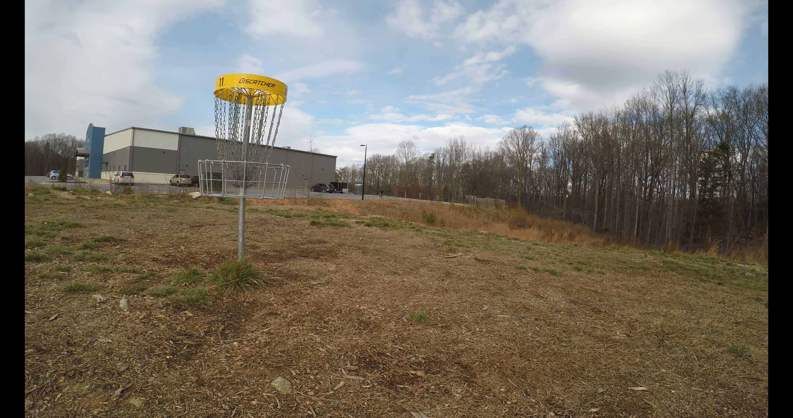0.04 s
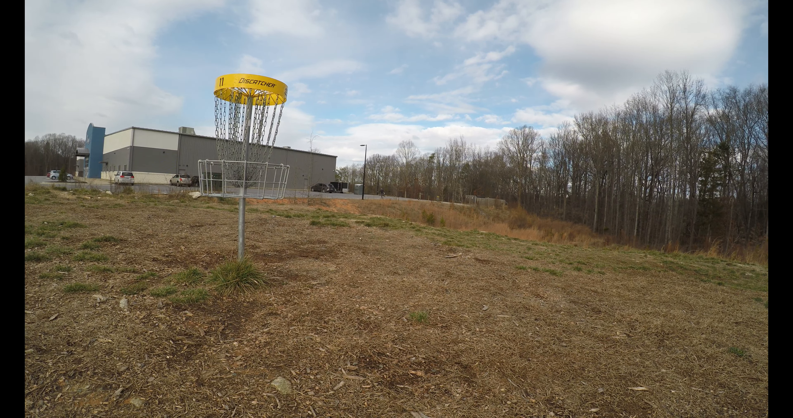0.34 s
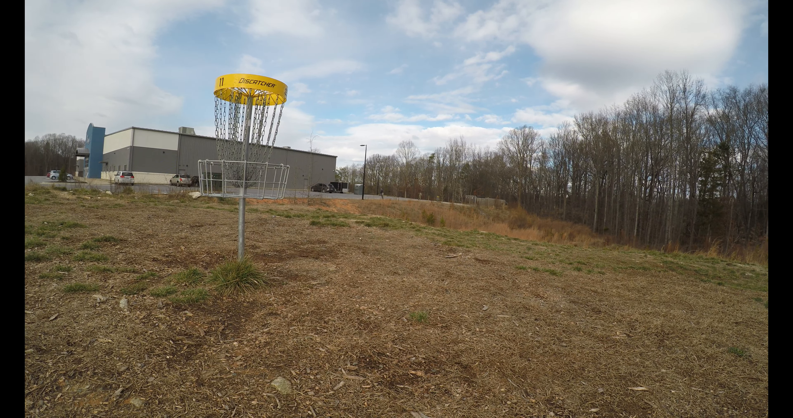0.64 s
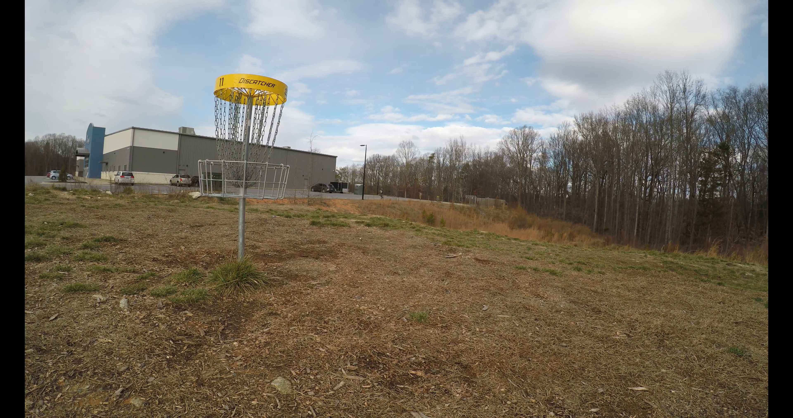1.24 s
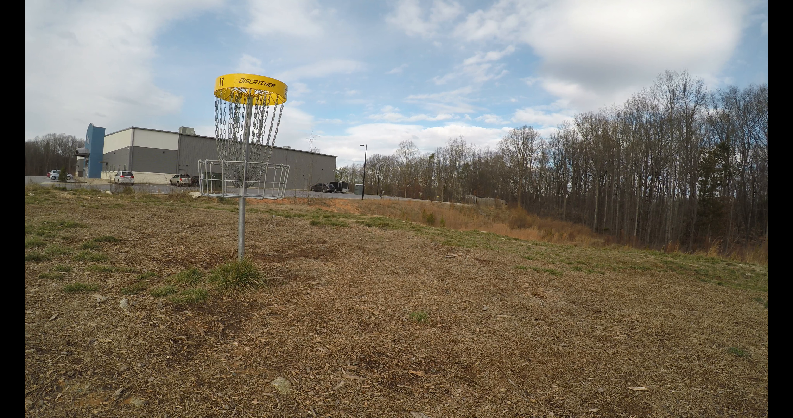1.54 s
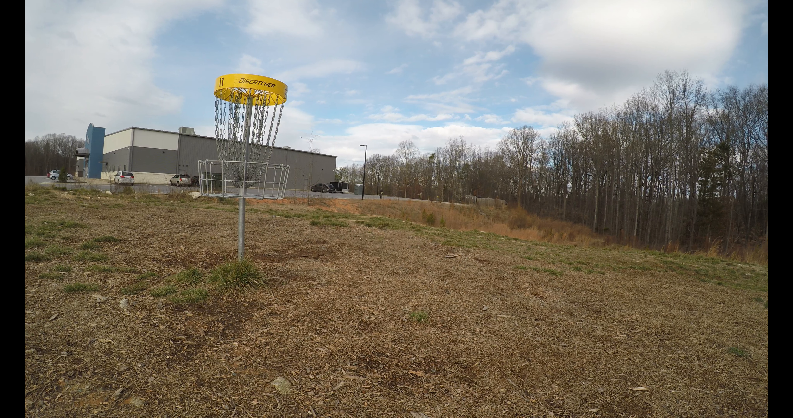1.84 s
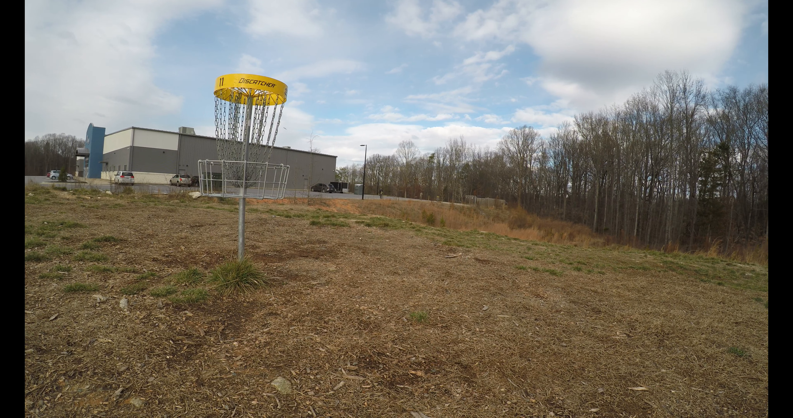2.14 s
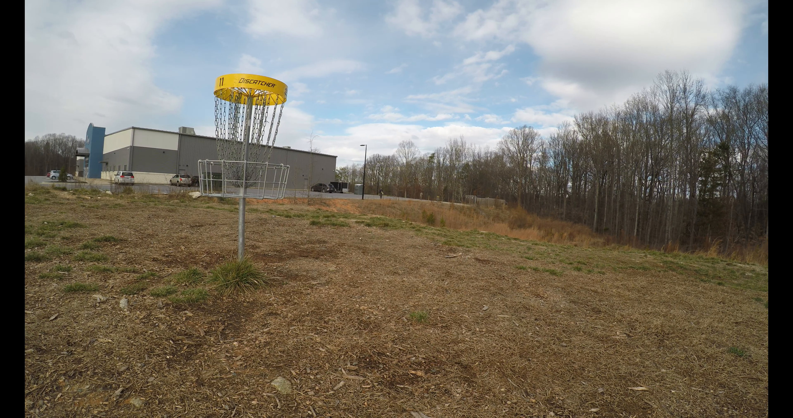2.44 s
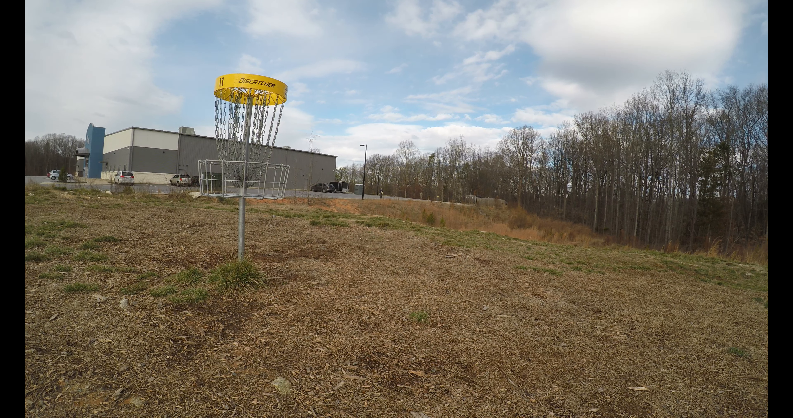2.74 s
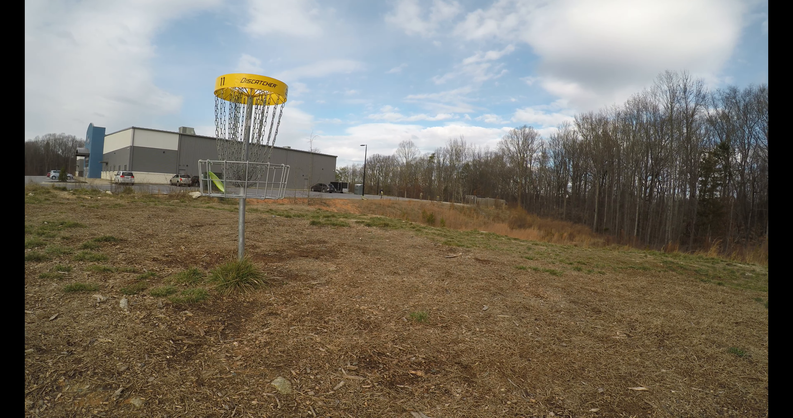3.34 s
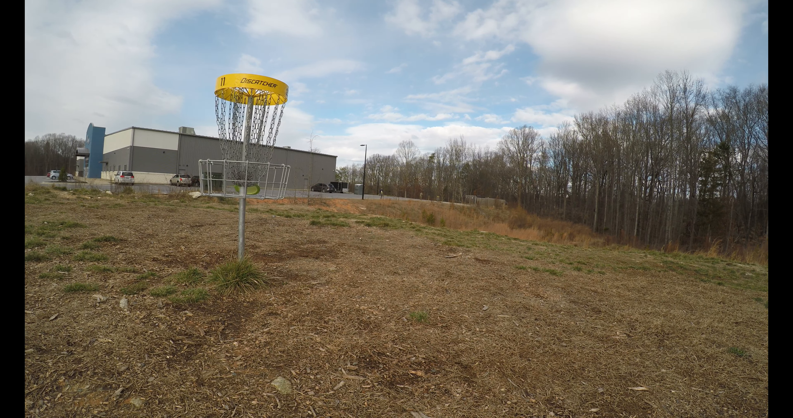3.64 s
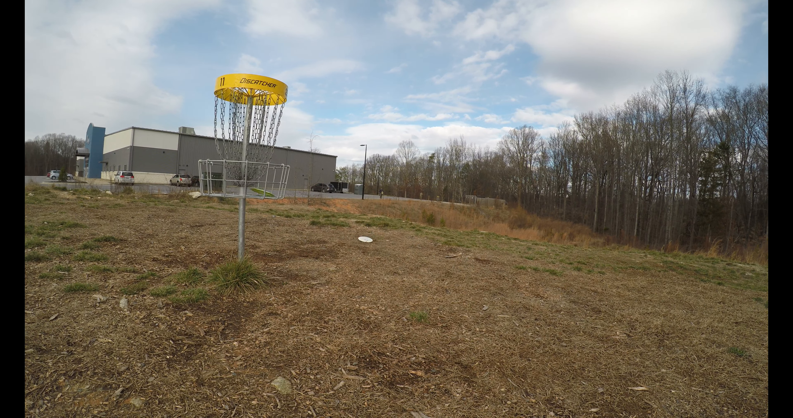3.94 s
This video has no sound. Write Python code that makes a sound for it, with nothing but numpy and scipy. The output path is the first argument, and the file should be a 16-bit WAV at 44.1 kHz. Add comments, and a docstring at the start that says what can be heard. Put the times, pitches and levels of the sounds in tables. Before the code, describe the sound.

Chains clash and ring as a golf disc lands in a basket, amid wind and traffic.

```python
"""A golf disc slaps into the hanging chains of a metal basket in an open field.
The blow shakes the frame, and the disc drops into the wire tray with a few small knocks.
The links clash dully while the disc presses on them and ring high once they swing free.
A low wind rumble and the wash of distant traffic go on throughout.
A faint high hiss comes and goes, with a brief scuff just before the disc hits."""
import sys
import numpy as np
from scipy import signal
from scipy.fft import rfft, irfft
from scipy.io import wavfile
from scipy.ndimage import uniform_filter1d, minimum_filter1d

SR = 44100
rng = np.random.default_rng(int(sys.argv[2]) if len(sys.argv) > 2 else 0)


def unload_wav(signal):
    """Save mono or channel-first audio to the path in sys.argv[1] as 16-bit WAV at rate SR, clipped to [-1, 1]."""
    wavfile.write(
        sys.argv[1],
        SR,
        np.round(np.clip(np.atleast_2d(signal).T, -1, 1) * 32767).astype(np.int16),
    )


N = 176400

# how strong the wind is at each pitch: pitch_hz, level_db
WIND_TONE = [(8.8, -34), (15, -5.5), (59, 1), (129, -2.5), (161, -8), (192, -5.5), (244, -14.5), (319, -18),
             (375, -28.5), (520, -42.5), (680, -61), (1140, -120)]
# gusts in the low and the upper bass: time_s, deep_db, upper_db
WIND_GUSTS = [(0, -2, 3), (.5, -1.5, -1), (.8, -1.5, 1), (1.1, 0.5, -1), (1.3, -3, 1), (1.6, -0.5, 0),
              (1.95, 0, -2.5), (2.25, -4.5, 1.5), (2.5, -1.5, 0), (3.0, -1, 1), (3.4, -4.5, 0.5),
              (3.65, -1, -2), (4, -3.5, 2)]
# how strong the traffic is at each pitch: pitch_hz, level_db
TRAFFIC_TONE = [(300, -13.5), (480, 1.5), (630, -2), (800, 0), (1000, 0), (1250, -2.5), (1500, -7),
                (2100, -6), (2400, -12), (3100, -18.5), (3600, -22), (4500, -26), (10000, -27.5),
                (12500, -35.5), (14000, -39.5)]
# the traffic growing louder and softer: time_s, level_db
TRAFFIC_SWELLS = [(0, 0.9), (.8, -0.55), (1.4, 1), (2.0, -0.25), (2.5, 1.5), (2.95, 0.9), (3.1, 1.9),
                  (4, 1)]
# how alike the traffic is on the left and right: pitch_hz, likeness (0 to 1), left_lead_rad
TRAFFIC_STEREO = [(590, 0.32, 2.5), (745, 0.51, 3), (1260, 0.46, 4), (1510, 0.18, 3), (1950, 1, 4),
                  (2500, .35, 4), (2560, 0.49, 0.75), (3170, .8, 1), (4500, 0.52, -2), (6000, 0.06, 0.5)]
# how strong the faint high hiss is at each pitch: pitch_hz, level_db
HISS_TONE = [(1500, -24.5), (2500, -3.5), (3100, 7.5), (4300, -13.5), (5900, -3.5), (7500, -12),
             (8500, -18), (10000, -16), (14000, -25)]
# the hiss coming and going, with a brief scuff near 3 s: time_s, level_db
HISS_SWELLS = [(0, -71), (.15, -60), (.6, -65), (1.05, -65.5), (1.35, -60.5), (2.0, -65.5), (2.55, -59.5),
               (2.99, -65), (3.035, -54.5), (3.08, -57.5), (3.7, -55), (4, -68)]
# how alike the hiss is on the left and right: pitch_hz, likeness (0 to 1)
HISS_STEREO = [(2500, .5), (3200, 0.91), (4500, .35), (6000, .08)]
# echoes in the open air: pitch_hz, ring_s (here and below, the time to fade by 60 dB)
FIELD_ECHO = [(200, .25), (1000, 0.98), (4000, 0.79), (14000, 1)]
# how far the basket's sounds lean to the left: pitch_hz, left_minus_right_db
BASKET_LEAN = [(300, 0.5), (800, 10), (1600, 4.5), (2200, -0.5), (3400, 3), (7000, -0.5), (9200, 0),
               (10000, 13), (11200, 3), (12000, 4.5), (12900, 9.5), (14000, 6)]
# the two unequal microphone openings: pitch_hz, left_minus_right_db
MIC_LEAN = [(30, .3), (125, .8), (250, 2), (400, 4), (600, 5), (900, 4.5), (1200, 3.5), (1700, 5),
            (2200, .5), (2700, -2), (4000, -.5), (6000, -2.5), (9000, -1.5), (11000, 0), (14000, 0)]
# tones of the shaken frame: pitch_hz, level_db, ring_s
FRAME_TONES = [(114, -6, 0.28), (142, -8.5, 0.21)]
# the disc landing in the tray: start_s, level_db, contact_ms
TRAY_HITS = [(3.3535, -15.5, .3), (3.369, -12, 0.53), (3.3745, -10, 0.7), (3.386, -18, 0.39),
             (3.5072, -21, 0.045), (3.518, -23.5, 0.1), (3.542, -25, 0.26), (3.566, -27, 0.3),
             (3.576, -26, 0.14), (3.5935, -33, 0.28), (3.6325, -26.5, 0.088)]
# tones of disc and tray together: pitch_hz, level_db, ring_s, left_lead_rad
TRAY_TONES = [(792, -5.5, 0.035, 3.5), (880, -16, 0.06, 3.5), (1037, -9, 0.023, 7.5), (1285, -17, 0.04, 8),
              (1980, -10, 0.022, -4), (2130, -12, 0.025, 3.5), (3330, -21, .02, -2.5),
              (3830, -11.5, 0.015, 11), (5650, -12, .018, 9)]
# the disc hitting the chains: start_s, level_db, contact_ms
DISC_HITS = [(3.2829, 1, 0.085), (3.28435, -10.5, 0.24), (3.2853, -6, 0.25), (3.2873, -18.5, 0.045),
             (3.2886, -13, 0.94), (3.352, -10.5, 0.16), (3.367, -23.5, .25)]
# tones of the struck disc: pitch_hz, level_db, ring_s, left_lead_rad
DISC_TONES = [(263, -3.5, 0.083, -0.5), (368, -15, 0.065, 3.5), (504, -23, 0.066, 3.5),
              (870, -12, 0.016, 3), (1223, -19.5, 0.025, -4.1), (1464, -21, 0.026, 0.5),
              (2160, -6, 0.02, 1.54), (2900, -12, 0.017, -1.5), (3380, -9, 0.019, -1),
              (4240, -11.5, .014, 7), (5470, -18, 0.021, 4), (5930, -11.5, 0.038, 4), (7260, -22, .014, -4)]
# tones of links pressed together: pitch_hz, level_db, ring_s, spread_hz
PRESSED_TONES = [(1540, -16, 0.016, 120), (1940, -16, 0.035, 70), (2237, -0.5, 0.051, 178),
                 (2950, -1.5, .06, 84), (3250, -1, 0.2, 58), (3464, 5.5, 0.04, 130), (3970, -5, .04, 220),
                 (5550, -2, .07, 280), (6050, 0.5, 0.062, 180), (6850, -3, 0.059, 400),
                 (9300, -2, .04, 590), (10100, -4, 0.087, 170)]
# tones of links hanging free: pitch_hz, level_db, ring_s, spread_hz
FREE_TONES = [(9870, 0.5, 0.26, 32), (10100, 3, 0.22, 80), (10500, -2, .13, 130), (11120, 1.5, 0.2, 78),
              (11400, -9, .11, 190), (12000, -2, .15, 100), (12560, -13, .1, 160), (12800, -8.5, 0.17, 65),
              (13450, -17, .1, 140), (13980, -10, .14, 150)]
# single pressed links clacking: start_s, level_db, favoured_hz
PRESSED_CLACKS = [(3.2915, -32.5, 2900), (3.297, -35, 6000), (3.3085, -32, 3500), (3.3535, -31.5, 6200),
                  (3.531, -42, 4200), (3.711, -47, 3800), (3.886, -59, 6500)]
# single free links clinking: start_s, level_db, favoured_hz
FREE_CLINKS = [(3.2985, -38, 10100), (3.3746, -34, 10600), (3.405, -33, 12000), (3.519, -45, 9900),
               (3.5455, -45.5, 10100), (3.595, -49, 10900), (3.718, -54, 10100), (3.7515, -56, 12000),
               (3.8206, -60, 11100), (3.843, -61, 9900)]
# pressed chains clashing: start_s, level_db, hold_s, fade_db_per_s
PRESSED_SURGES = [(3.281, -31.5, 0.048, 240), (3.351, -33, 0.031, 235), (3.512, -49, 0.026, 143),
                  (3.705, -57, 0.01, 146), (3.905, -54.5, 0.028, 202)]
# chains jingling as they swing free: start_s, level_db, hold_s, fade_db_per_s
FREE_SURGES = [(3.298, -43, 0.027, 250), (3.372, -32, 0.065, 330), (3.53, -49, .015, 200),
               (3.575, -48, 0.02, 353), (3.712, -53.5, 0.024, 407)]


def amp(db):
    """Turns decibels into a number to multiply by."""
    return 10 ** (np.asarray(db) / 20)


def evened(x):
    """Scales a sound to an average (rms) level of 1."""
    return x / np.sqrt(np.mean(x ** 2) + 1e-20)


def fading(t, ring_s):
    """A fade that falls by 60 dB every ring_s seconds."""
    return np.exp(-np.log(1000) * t / ring_s)


def at_pitch(table, hz, column=1):
    """Looks up a table by pitch, gliding between its rows."""
    columns = np.transpose(table)
    return np.interp(np.log(hz + 1), np.log(columns[0] + 1), columns[column])


def over_time(table, column=1):
    """Joins a table's rows into one value for every sample."""
    columns = np.transpose(table)
    return np.interp(np.arange(N) / SR, columns[0], columns[column])


def add(mix, start_s, sound):
    """Mixes a stereo sound in at its start time."""
    part = mix[:, round(start_s * SR):][:, :sound.shape[1]]
    part += sound[:, :part.shape[1]]


def dulled(x, corner_hz):
    """Softens the treble above corner_hz."""
    return signal.lfilter(*signal.butter(2, corner_hz, fs=SR), x)


def lean(x, table):
    """Tips each pitch to the left or right."""
    side_db = at_pitch(table, np.fft.rfftfreq(2 * N, 1 / SR)) / 2
    return irfft(rfft(x, 2 * N) * amp([side_db, -side_db]))[:, :N]


def noise_pair(tone, likeness, left_lead_rad=0):
    """The spectra (pitch content) of a left and a right noise that are partly alike."""
    hz = np.fft.rfftfreq(N, 1 / SR)
    left, other = rfft(rng.standard_normal((2, N)))
    right = (likeness * left + np.sqrt(1 - likeness ** 2) * other) * np.exp(-1j * left_lead_rad)
    return np.array([left, right]) * amp(at_pitch(tone, hz))


def wind(level_db=-12.5, split_hz=110, apart_db=-24, apart_hz=50, steadiness=0.55):
    """Wind rumbles almost alike on both sides; its deep and upper parts swell separately."""
    hz = np.fft.rfftfreq(N, 1 / SR)
    apart = amp(apart_db) * hz ** 2 / (hz ** 2 + apart_hz ** 2)
    spectrum = noise_pair(WIND_TONE, likeness=1 - apart ** 2)
    deep = irfft(spectrum / (1 + (hz / split_hz) ** 4))
    upper = irfft(spectrum) - deep
    out = 0
    for column, part in enumerate([deep, upper], start=1):
        power = uniform_filter1d(uniform_filter1d(part[0] ** 2, size=2200), size=2200)
        steadying = (power.mean() / power) ** (steadiness / 2)  # calms the noise's own wobble
        out = out + part * amp(over_time(WIND_GUSTS, column)) * steadying
    return amp(level_db) * evened(out)


def traffic(base_db=-43.5):
    """Far-off traffic blends into a wide, smooth wash."""
    hz = np.fft.rfftfreq(N, 1 / SR)
    likeness, lead = at_pitch(TRAFFIC_STEREO, hz), at_pitch(TRAFFIC_STEREO, hz, column=2)
    wash = irfft(noise_pair(TRAFFIC_TONE, likeness, lead))
    return amp(base_db + over_time(TRAFFIC_SWELLS)) * evened(wash)


def high_hiss():
    """A faint high hiss comes and goes, with a brief scuff just before the disc hits."""
    likeness = at_pitch(HISS_STEREO, np.fft.rfftfreq(N, 1 / SR))
    return amp(over_time(HISS_SWELLS)) * evened(irfft(noise_pair(HISS_TONE, likeness)))


def field_echo(x, echo_db=-17, echoes_per_s=2000):
    """Ground and trees add thin echoes, each pitch dying away at its own speed."""
    echoes = rng.standard_normal((2, SR)) * (rng.random((2, SR)) < echoes_per_s / SR)
    echoes[:, :SR // 100] = 0  # nothing comes back in the first 10 ms
    hz, t, bands = signal.stft(echoes, SR, nperseg=256)
    bands = bands * fading(t, at_pitch(FIELD_ECHO, hz)[:, None])
    tail = signal.istft(bands, SR, nperseg=256)[1]
    return x + amp(echo_db) * signal.fftconvolve(x, tail / np.linalg.norm(tail[0]), axes=1)[:, :N]


def frame_thud(start_s=3.2865, rise_s=0.0021):
    """The weight of the disc shakes the whole basket for a moment."""
    out, t = np.zeros((2, N)), np.arange(SR // 3) / SR
    ring = sum(amp(db) * fading(t, ring_s) * np.sin(2 * np.pi * hz * t) for hz, db, ring_s in FRAME_TONES)
    add(out, start_s, np.array([ring, ring]) * np.minimum(t / rise_s, 1))
    return out


def disc_knocks(hits, tones, scuff_db, scuff_s, scuff_hz, bend_s, scuff_low_hz=1300, bend_hz=1420):
    """Each blow of the disc scuffs and rings; tones below bend_hz wait for the body to bend."""
    out, t = np.zeros((2, N)), np.arange(SR // 5) / SR
    for start_s, level_db, contact_ms in hits:
        scuff = amp(scuff_db) * dulled(rng.standard_normal((2, len(t))), scuff_hz) * np.exp(-t / scuff_s)
        knock = signal.lfilter(*signal.butter(2, scuff_low_hz, "highpass", fs=SR), scuff)
        for hz, db, ring_s, lead in tones:
            age = np.maximum(t - bend_s / (1 + (hz / bend_hz) ** 4), 0)
            phase = 2 * np.pi * hz * age + np.array([[lead], [-lead]]) / 2
            rise = np.minimum(2 * hz * age, 1)
            knock += amp(db) * rise * fading(age, ring_s) * np.cos(phase)
        softness = np.exp(-1000 / (contact_ms * SR))  # a longer contact sounds duller
        add(out, start_s, amp(level_db) * signal.lfilter([1 - softness], [1, -softness], knock))
    return out


def link_ring(tones, t, scatter_db=0.5):
    """One link rings a little off pitch; where it is struck makes each tone louder or softer."""
    ring = np.zeros((2, len(t)))
    for hz, db, ring_s, spread_hz in tones:
        phase = rng.uniform(0, 2 * np.pi) + rng.standard_normal((2, 1)) * min(hz / 6000, 1.3)
        own_hz = hz + spread_hz * rng.standard_normal()
        tone = np.sin(2 * np.pi * own_hz * t + phase) * fading(t, ring_s)
        ring += amp(db + scatter_db * rng.standard_normal()) * evened(tone)
    return ring


def link_hits(hits, tones, focus_db_per_octave, damping_db_per_s, rise_s):
    """One link is hit hard; the spot struck favours tones near one pitch, and nearby links hush it."""
    out, t = np.zeros((2, N)), np.arange(SR // 3) / SR
    for start_s, level_db, favoured_hz in hits:
        favoured = [(hz, db - focus_db_per_octave * abs(np.log2(hz / favoured_hz)), ring_s, spread_hz)
                    for hz, db, ring_s, spread_hz in tones]
        ring = link_ring(favoured, t) * amp(-damping_db_per_s * t)
        ring /= ring[:, :SR // 200].std()  # the first 5 ms set the level
        add(out, start_s, amp(level_db) * np.minimum(t / rise_s, 1) * ring)
    return out


def chains(surges, tones, hits_per_s, variety_db, tick_db, tick_hz, rise_s, links):
    """Links of slightly different pitch collide at random, as hard as the swinging chains drive them."""
    now, t = np.arange(N) / SR, np.arange(SR // 3) / SR
    power = 0
    for start_s, level_db, hold_s, fade_db_per_s in surges:
        rise = np.clip((now - start_s) / rise_s, 0, 1)
        power += (rise * amp(level_db - fade_db_per_s * np.maximum(now - start_s - hold_s, 0))) ** 2
    # a count climbs by random steps; each whole number it passes is a collision
    count = np.cumsum(rng.exponential(1, N) ** 2) / 2 * hits_per_s / SR
    hit = np.diff(np.floor(count), prepend=0) > 0
    direction = rng.choice([-1, 1], N)
    strength = amp(variety_db * np.minimum(rng.exponential(1, N), 2))
    clicks = np.sqrt(power) * evened(hit * direction * strength)
    which_link, out = rng.integers(0, links, N), np.zeros((2, N))
    first = round(surges[0][0] * SR)
    for link in range(links):
        ring = evened(link_ring(tones, t))
        tick = dulled(rng.standard_normal(ring.shape) * np.exp(-t / 0.00044), tick_hz)
        clink = (ring + amp(tick_db) * evened(tick)) / np.sqrt(len(t))
        own_clicks = (clicks * (which_link == link))[None, first:]
        out[:, first:] += signal.oaconvolve(own_clicks, clink, axes=1)[:, :N - first]
    return out


def scene():
    """Disc, chains and tray, slightly to the left, over wind, traffic and a faint hiss."""
    slap = disc_knocks(DISC_HITS, DISC_TONES, scuff_db=-7.5, scuff_s=0.0032, scuff_hz=6500, bend_s=0.0024)
    tray = disc_knocks(TRAY_HITS, TRAY_TONES, scuff_db=-1, scuff_s=0.0029, scuff_hz=5200, bend_s=0.0004)
    clash = chains(PRESSED_SURGES, PRESSED_TONES, hits_per_s=1300, variety_db=9,
                   tick_db=-2.5, tick_hz=8250, rise_s=0.0017, links=32)
    jingle = chains(FREE_SURGES, FREE_TONES, hits_per_s=420, variety_db=7,
                    tick_db=-11.5, tick_hz=12000, rise_s=0.0041, links=24)
    clacks = link_hits(PRESSED_CLACKS, PRESSED_TONES,
                       focus_db_per_octave=8, damping_db_per_s=150, rise_s=0.0015)
    clinks = link_hits(FREE_CLINKS, FREE_TONES, focus_db_per_octave=46, damping_db_per_s=70, rise_s=0.001)
    basket = slap + frame_thud() + tray + clash + jingle + clacks + clinks
    return lean(field_echo(basket), BASKET_LEAN) + wind() + traffic() + high_hiss()


def record(dry, ceiling=0.93, dip_samples=441, top_hz=14250):
    """The microphone hears each side unequally, turns loud peaks down and cuts the highest treble."""
    heard = lean(dry, MIC_LEAN)
    gain = ceiling / np.maximum(abs(heard).max(0), ceiling)
    gain = uniform_filter1d(minimum_filter1d(gain, dip_samples), dip_samples)
    treble_cut = signal.firwin(511, top_hz, window=("kaiser", 8), fs=SR)
    return signal.oaconvolve(heard * gain, treble_cut[None], "same")


dry = scene()
out = record(dry)
unload_wav(out)
```